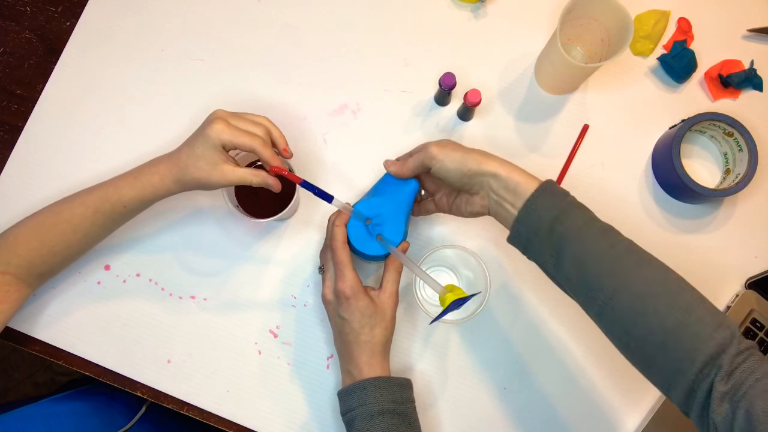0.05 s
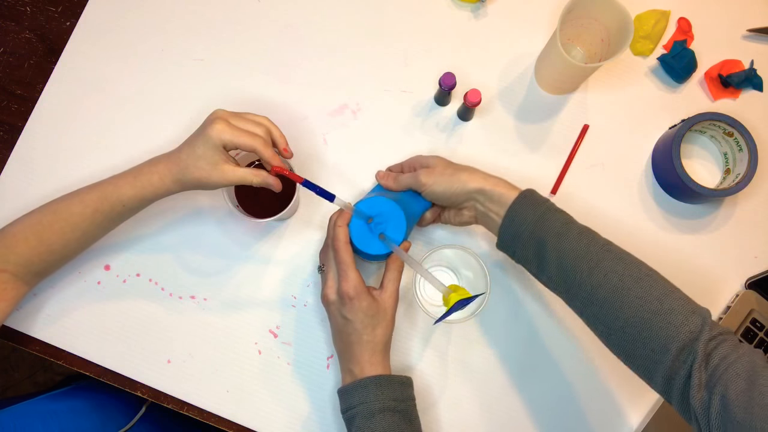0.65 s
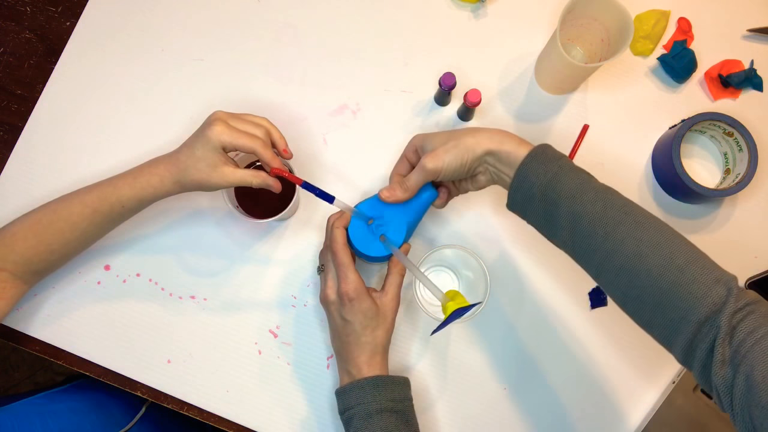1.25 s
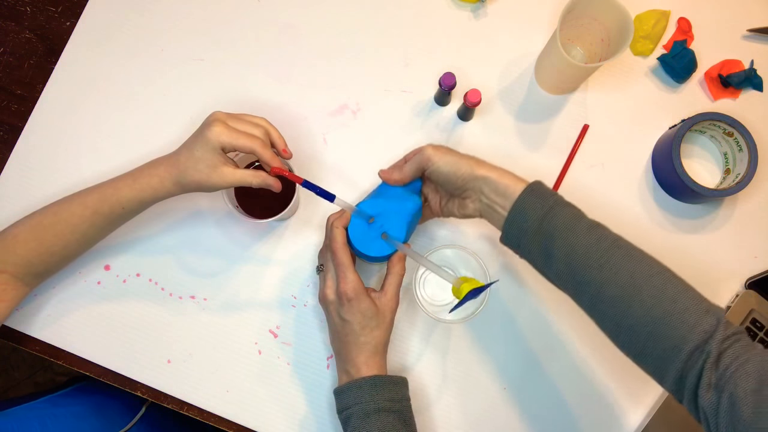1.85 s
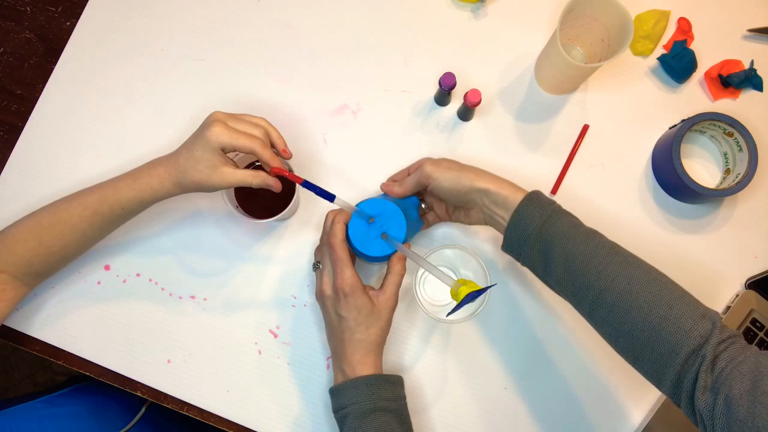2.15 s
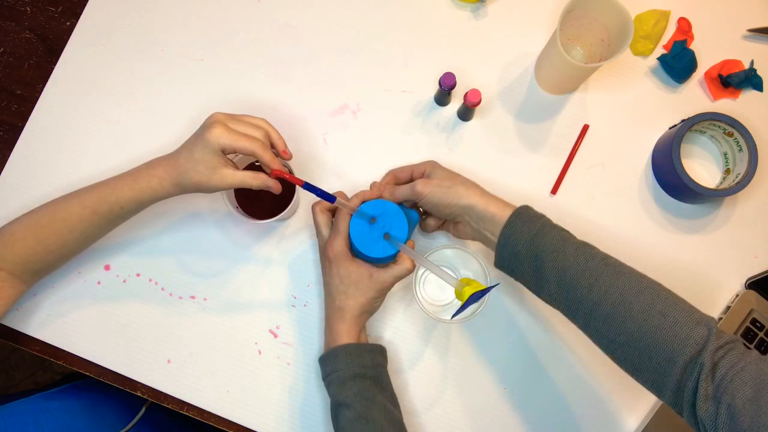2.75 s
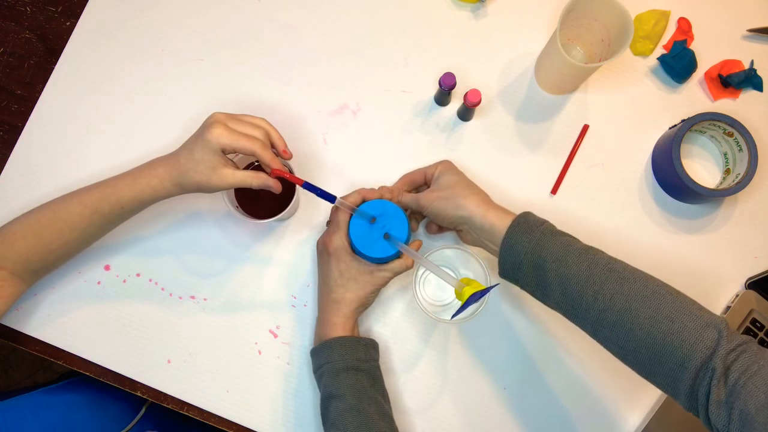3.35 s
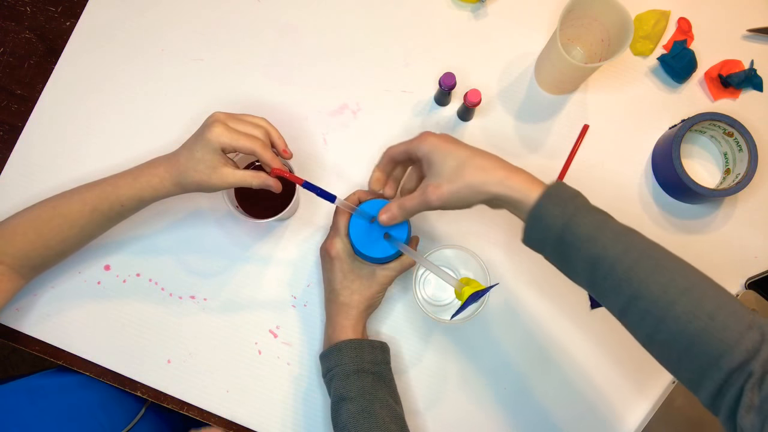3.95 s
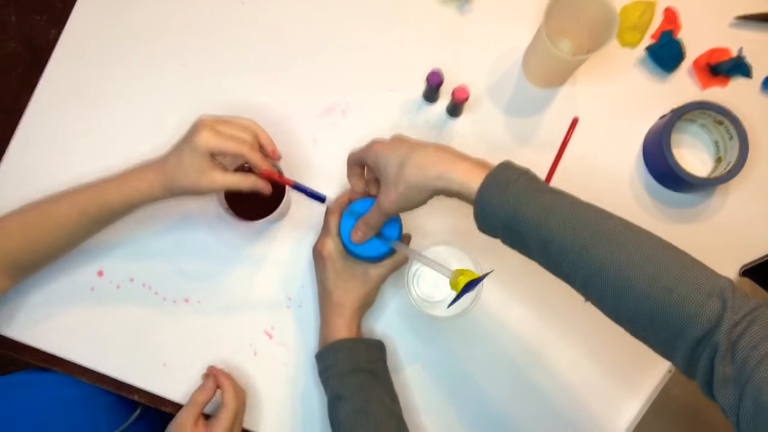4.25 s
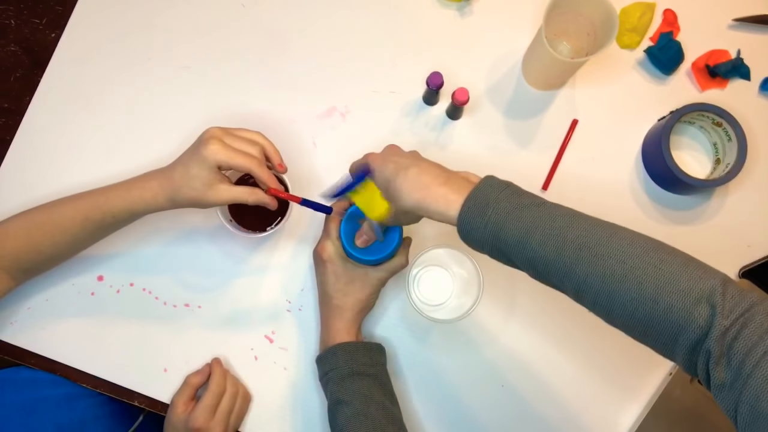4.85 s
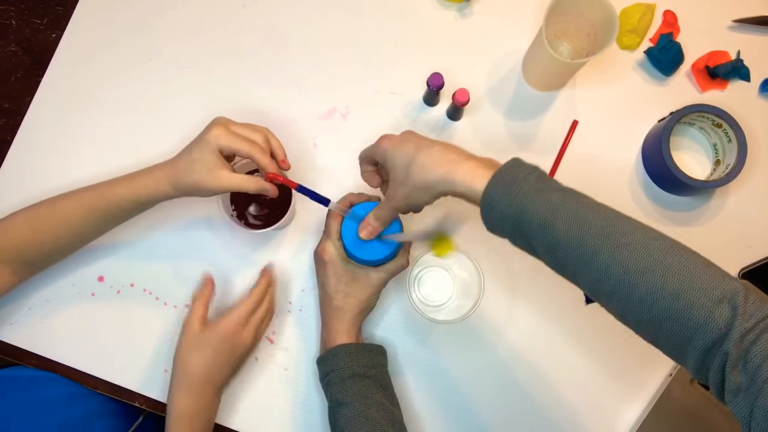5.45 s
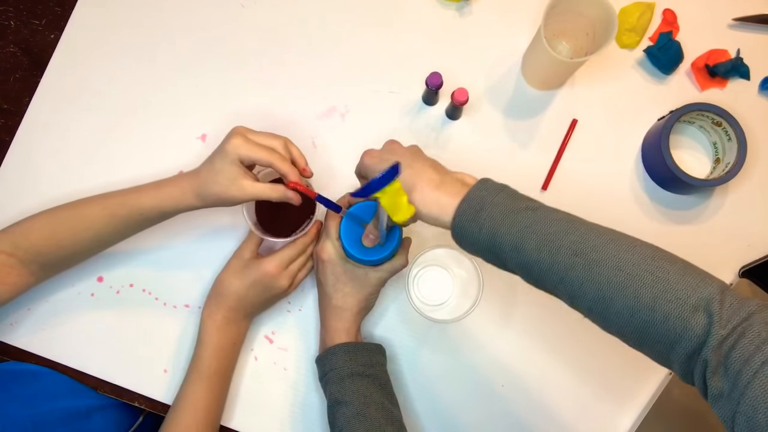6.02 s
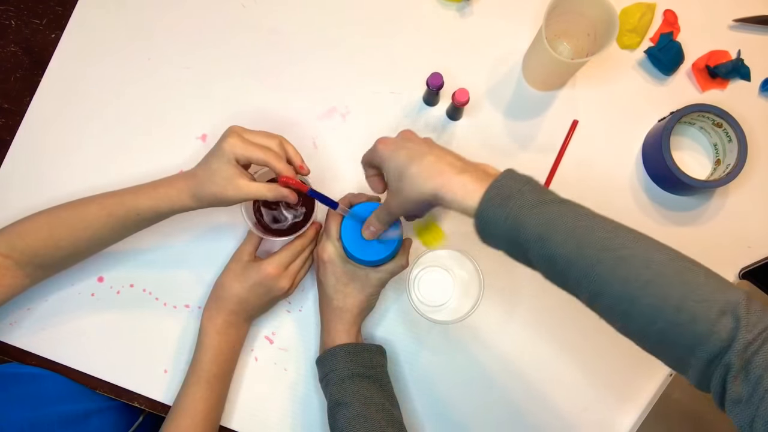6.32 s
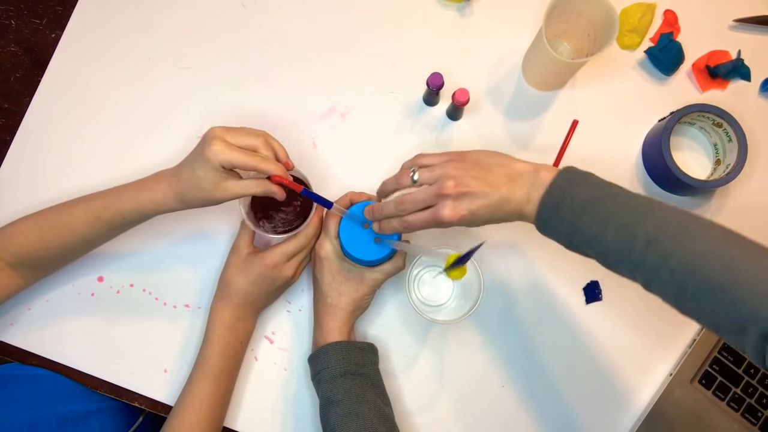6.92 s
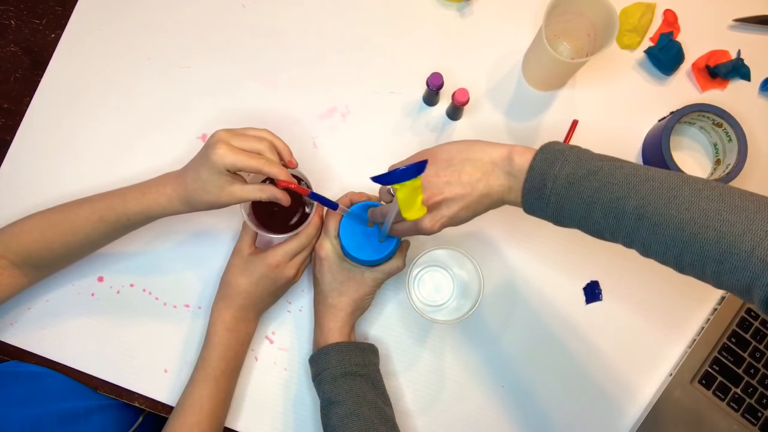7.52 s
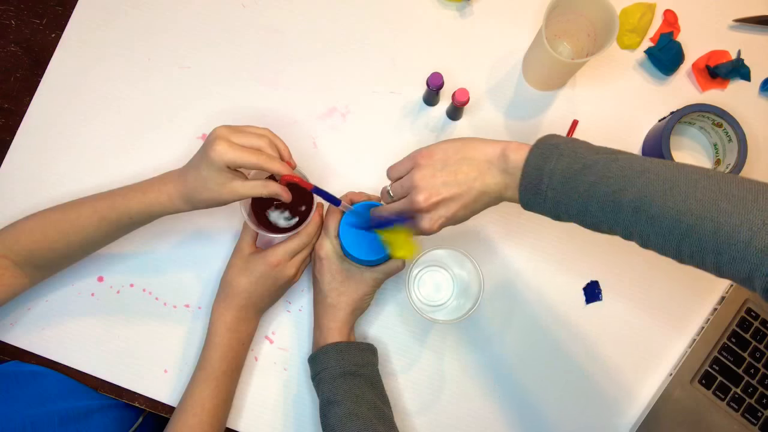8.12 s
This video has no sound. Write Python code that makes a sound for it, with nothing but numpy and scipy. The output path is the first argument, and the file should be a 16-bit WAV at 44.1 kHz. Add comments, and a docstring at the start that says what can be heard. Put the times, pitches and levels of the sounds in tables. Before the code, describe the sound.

Close above a table in a small, faintly humming room, a balloon is stretched over a plastic cup with quiet scuffs and light knocks. A small rubber snap comes first, then two sharp, loud ones half a second apart. Hands go on tapping and rubbing the cup, straws click on the rims, and pressing the balloon pushes faint gurgles and bubble plops through the straws.

```python
"""A low room hum, then fingers rubbing and knocking on a toy pump: a balloon stretched over a plastic cup,
with straws into two more cups. The rubber slips and snaps onto the cup three times, ringing skin and wall.
Then the skin is pressed and let go: straws tick against the cups, and a little water gurgles, plops and
hoots through them. One microphone, close above a table in a small room."""
import sys
import numpy as np
from scipy import signal
from scipy.fft import rfft, irfft
from scipy.io import wavfile

SR = 44100
rng = np.random.default_rng(int(sys.argv[2]) if len(sys.argv) > 2 else 0)


def waveform_to_disk(signal):
    """Save audio, clipped to [-1, 1], as 16-bit WAV at the path in sys.argv[1]."""
    frames = np.transpose(np.atleast_2d(signal))
    scaled = np.clip(frames, -1, 1) * 32767
    samples = np.round(scaled).astype(np.int16)
    wavfile.write(sys.argv[1], SR, samples)


N = 360738
TIME = np.arange(N) / SR
AGE = TIME[:SR // 3]  # seconds into one short event
SWELL_LEAD_S = AGE.mean()  # a swell starts this long before its peak


def undb(db):
    """Decibels to gain."""
    return 10 ** (np.asarray(db) / 20)


def unit(x):
    """Scale to unit energy."""
    return x / np.sqrt(np.sum(x ** 2) + 1e-18)


def unit_peak(x):
    """Scale to a peak of 1."""
    return x / np.abs(x).max()


def add(track, s, x):
    """Mix x into the track from time s."""
    i = int(s * SR)
    track[i:i + len(x)] += x[:N - i]


def play(rows, voice, lead_s=0):
    """Sound the voice once a row, lead_s before the time in the row's first column."""
    out = np.zeros(N)
    for s, *settings in rows:
        add(out, s - lead_s, voice(*settings))
    return out


def band(x, hz, q):
    """One resonance."""
    w = 2 * np.pi * min(hz, .45 * SR) / SR
    a = np.sin(w) / (2 * q)
    return signal.lfilter([a, 0, -a], [1 + a, -2 * np.cos(w), 1 - a], x)


def low_cut(x, hz):
    """Take off the bass."""
    return signal.sosfilt(signal.butter(2, hz, "highpass", fs=SR, output="sos"), x)


def high_cut(x, hz, order=2):
    """Take off the treble."""
    return signal.sosfilt(signal.butter(order, min(hz, .45 * SR), fs=SR, output="sos"), x)


def colour(x, points, size=2048):
    """Causal filter through (Hz, dB) points."""
    hz, db = np.transpose(points)
    grid = np.maximum(np.fft.rfftfreq(size, 1 / SR), 1)
    gain = undb(np.interp(np.log(grid), np.log(hz), db))
    cepstrum = irfft(np.log(gain))
    cepstrum[1:size // 2] *= 2  # fold to minimum phase
    cepstrum[size // 2 + 1:] = 0
    return signal.fftconvolve(x, irfft(np.exp(rfft(cepstrum))))[:len(x)]


def fade(t60):
    """Free decay after a blow, 60 dB down in t60 seconds."""
    return np.exp(-np.log(1000) * AGE / t60)


def ring(modes):
    """Damped modes struck together."""
    return unit(sum(undb(db) * fade(t60) * np.sin(2 * np.pi * hz * AGE) for hz, db, t60 in modes))


def burst(t60):
    """A dying rattle of tiny contacts."""
    return unit(rng.standard_normal(len(AGE)) * fade(t60))


def crack(rattle_db, t60):
    """One clean impact and the rattle behind it."""
    return signal.unit_impulse(len(AGE)) + undb(rattle_db) * burst(t60)


def swell(x, half_s):
    """A bell-shaped swell of the given half length, centred in x, of rms 1 at its top."""
    bell = np.exp(-((AGE - SWELL_LEAD_S) / half_s) ** 2 / 2)
    return x / np.std(x) * bell * signal.windows.tukey(len(AGE), .5)


def grains(per_s, spread_db):
    """Random tiny impulses of uneven size."""
    chance, size = rng.random(len(AGE)), rng.standard_normal(len(AGE))
    return (chance < per_s / SR) * np.sign(size) * undb(spread_db * np.abs(size))


def waver(hz):
    """A slow random wobble of spread 1."""
    wobble = high_cut(rng.standard_normal(len(AGE)), hz)
    return wobble / np.std(wobble)


# The room's air, all round the microphone. Each row: frequency in Hz, relative level in dB.
AIR_COLOUR = [(15, -51), (25, -15), (70, -1), (127, -2), (161, -8), (185, -9.5), (263, -10), (301, -15),
              (373, -16.5), (624, -23), (677, -24.5), (1370, -28.5), (1890, -33), (3520, -35.5),
              (7000, -39.5), (9400, -43), (10400, -48.5), (11500, -42), (16000, -46.5)]
# The hum in the room. Each row: pitch in Hz, rms level in dB.
HUM_TONES = [(97, -67), (190, -67.5), (261, -76.5)]


def room_tone(air_db=-56.5):
    """Low room rumble, smooth hiss and a wavering hum."""
    air = colour(rng.standard_normal(N), AIR_COLOUR, size=8192)
    hum = sum(undb(db) * unit(band(band(rng.standard_normal(N), hz, 16), hz, 16)) for hz, db in HUM_TONES)
    return np.sqrt(N) * (undb(air_db) * unit(air) + hum)


# Fingers on the balloon, just below the microphone; quick scuffs are broad, slow drags sing.
# Each row: peak time in seconds, half length in seconds, level in dB before gain_db, centre in Hz, Q.
FINGER_RUBS = [(0.281, 0.0086, -56.5, 5760, 0.75), (0.32, 0.0098, -56, 3470, 0.3),
               (0.795, .022, -60, 2870, 0.61), (1.019, 0.076, -70.5, 3500, .6),
               (1.072, 0.013, -56.5, 2880, 0.93), (1.213, 0.046, -67, 2700, 0.73),
               (1.452, 0.022, -59, 3880, 0.78), (1.982, .022, -64.5, 3200, .74),
               (2.131, 0.032, -62, 3800, 0.86), (2.244, 0.033, -58, 3500, 0.57),
               (2.63, 0.024, -60, 3800, 1.04), (2.81, 0.12, -70.5, 3800, 4.7),
               (3.069, 0.17, -71, 5500, 0.6), (4.173, 0.013, -51, 2880, 0.71),
               (4.241, 0.059, -63.5, 2470, 3.5), (5.052, 0.0085, -57.5, 6400, 2.7),
               (5.47, 0.067, -73, 4500, 0.57), (5.719, 0.096, -71, 4100, 5), (5.97, 0.1, -70.5, 4170, 3.8),
               (5.959, 0.11, -71, 6650, 2.5), (6.662, 0.026, -69, 4000, .7),
               (7.371, 0.14, -74.5, 4095, 6.2), (7.738, 0.045, -74, 4090, 1.7),
               (8.063, 0.01, -62, 5200, 1.8), (8.143, .051, -67.5, 4200, 7.1)]


def rub(half_s, db, hz, q, gain_db=-3, hiss_db=-14, grip_db=2):
    """Skin slides on the rubber in dense, tiny slips under an uneven grip: a resonance over a soft hiss."""
    slips = grains(per_s=6000, spread_db=3) * undb(grip_db * waver(35))
    sing = unit(band(band(slips, hz, q), hz, q))
    hiss = unit(high_cut(band(slips, 3000, 0.77), 11000)) / np.sqrt(q)
    return undb(db + gain_db) * swell(sing + undb(hiss_db) * hiss, half_s)


# Fingers, cups and straws knocking together on the table.
# Each row: start in seconds, peak level of the ring in dB, pitch in Hz.
CUP_KNOCKS = [(.799, -38.5, 292), (0.825, -42.5, 329), (.902, -42.5, 448), (.974, -38, 388),
              (1.467, -44, 493), (1.663, -52, 490), (1.714, -49, 482), (1.716, -56, 944),
              (1.851, -62, 1380), (2.628, -58, 1000), (3.322, -44, 348), (3.52, -52.5, 525),
              (3.634, -42, 333), (3.662, -39.5, 440), (4.151, -43, 227.5), (4.154, -40.5, 759),
              (4.159, -27.5, 365), (4.161, -36.5, 608), (4.167, -41, 336), (4.18, -38.5, 610),
              (4.262, -53, 1350), (4.358, -44, 416), (4.401, -57, 770), (4.399, -54, 1720),
              (4.486, -37, 383), (4.484, -45.5, 825), (4.779, -48, 854), (4.935, -45.5, 797),
              (5.005, -55, 846), (5.375, -41, 435), (5.614, -48, 475), (5.615, -52.5, 1090),
              (6.3135, -42.5, 900), (6.364, -48.5, 1315), (6.511, -52.5, 1114), (6.802, -33, 392),
              (6.801, -50, 1020), (6.853, -49, 553), (6.8535, -54, 1110), (7.087, -62, 913),
              (7.385, -59, 1000), (7.694, -50, 431), (7.936, -46, 572), (7.9365, -44.5, 850),
              (7.94, -41.5, 1120), (8.143, -56.5, 1040)]


def knock(db, hz, middling_db=-45, middling_hz=600, push_cycles=0.84):
    """A soft blow: a hand-damped cup mode, a weaker one above, and a scuff of contact."""
    t60 = 0.042 * 2 ** ((middling_db - db) / 59)  # a firmer finger damps the cup
    push = 1 - np.exp(-AGE * hz / push_cycles)  # low knocks swell, high ones start at once
    body = ring([(hz, 0, t60), (1.3 * hz, -5, 0.71 * t60)]) * push
    scuff_db = -9.5 + 9.5 * np.log2(hz / middling_hz)  # small, stiff parts scuff more
    scuff_hz = 970 * (hz / middling_hz) ** 0.043
    scuff = high_cut(band(band(burst(0.069), scuff_hz, 0.92), scuff_hz, 0.62), 2900)
    return undb(db) * (unit_peak(body) + undb(scuff_db) * unit_peak(scuff))


# Straws against the cup rims, close up.
# Each row: start in seconds, peak level in dB before gain_db, straw resonance in Hz.
STRAW_TICKS = [(0.902, -50.5, 3680), (0.974, -48, 3400), (1.7143, -52, 2110), (3.118, -45, 1300),
               (3.6628, -30, 9200), (4.026, -44.5, 1800), (4.409, -47.5, 5580), (4.614, -49, 1600),
               (4.735, -54.5, 2320), (4.779, -47, 2200), (4.9344, -46.5, 4440), (4.959, -53.5, 3320),
               (5.0035, -51.5, 4570), (5.6133, -43.5, 5460), (5.793, -51.5, 1300), (5.835, -53, 1450),
               (6.3154, -46, 1390), (6.3627, -35, 12200), (6.51, -42, 5650), (6.6461, -40, 2400),
               (6.647, -45, 3860), (6.694, -44, 3650), (6.7995, -48.5, 2270), (6.8523, -45, 5400),
               (7.086, -55, 3950), (7.381, -52, 4540), (7.669, -47.5, 3870), (7.7934, -46, 2200),
               (8.0405, -51, 4250)]


def tick(db, hz, gain_db=3, rim_db=-7, broad_db=-15):
    """Hard plastic touches plastic: a click briefly rings the straw and, never quite alike, the rim."""
    hit = crack(0, t60=.026 / np.hypot(1, hz / 5000))  # high ticks die sooner
    rim_hz = 4300 * np.exp(.15 * rng.standard_normal())
    straw = band(hit, hz, 3.5)
    rim = undb(rim_db) * band(hit, rim_hz, 4)
    broad = undb(broad_db) * band(hit, 2200, .74)
    return undb(db + gain_db) * unit_peak(straw + rim + broad)


# Hands passing lightly over the balloon, faint even this close.
# Each row: peak time in seconds, half length in seconds, level in dB.
HAND_RUSTLES = [(1.048, 0.034, -72.5), (1.604, .03, -77.5), (2.165, .06, -81), (3.036, 0.038, -79),
                (4.204, 0.088, -72.5), (4.58, 0.053, -89), (5.04, 0.031, -74), (5.45, 0.08, -70.5),
                (5.75, .09, -73), (5.98, 0.11, -76), (6.68, 0.033, -68), (7.285, 0.021, -74),
                (7.73, .04, -73), (8.083, .04, -73.5)]
# Their tone at the microphone. Each row: frequency in Hz, relative level in dB.
BRUSH_COLOUR = [(1000, -20.5), (4000, -4.5), (7000, -0.5), (10300, -8.5), (13500, -1.5), (16000, -2)]


def rustle(half_s, db):
    """Dry skin and sleeve brush the balloon in very fine grains."""
    return undb(db) * swell(colour(grains(per_s=2500, spread_db=5), BRUSH_COLOUR), half_s)


def gurgle(half_s, db, hz, gain_db=-1):
    """Small bubbles of several sizes, each ringing for a few cycles, muffled by the cup."""
    ratios = np.geomspace(.58, 1.6, 7)
    bubbles = sum(band(grains(per_s=60, spread_db=4), hz * ratio, 9) / ratio for ratio in ratios)
    muffled = high_cut(band(bubbles, hz, 0.23), 1650, order=4)
    return undb(db + gain_db) * swell(muffled, half_s)


def creak(half_s, db, hz=2210, q=0.37):
    """Sparse, crisp slips of the stretched rubber under a finger."""
    slips = signal.fftconvolve(grains(per_s=46, spread_db=4), crack(0, t60=0.026))[:len(AGE)]
    return undb(db) * swell(band(band(slips, hz, q), hz, q / 2), half_s)


# A finger bearing down on the pump cup.
# Each row: peak time in seconds, half length in seconds, level in dB before the gurgle's gain_db.
SKIN_PRESSES = [(1.462, 0.011, -55.5), (4.236, 0.039, -62), (4.588, 0.12, -64.5), (5.861, 0.047, -60),
                (6.877, 0.014, -64), (7.751, 0.041, -64)]


def press(half_s, db):
    """Pressing drives water through the straws while the skin creaks, longer and quieter."""
    return gurgle(half_s, db, hz=1022) + creak(1.9 * half_s, db - 13)


# The thin wall of the pump cup. Each row: mode in Hz, relative level in dB, t60 in seconds.
CUP_WALL_MODES = [(1236, -10.5, 0.16), (1365, -13.5, .23), (2530, -10, .12), (3110, -15.5, .22),
                  (3844, -13.5, .22), (4030, -14, 0.32), (6370, -5, .15), (6270, -5.5, .16),
                  (6430, -3.5, .11), (6544, -6.5, .12), (6770, -6, .14), (6960, -6.5, .12),
                  (7600, -9.5, .18), (7750, -10, .12)]


def cup_wall(hardness_hz):
    """The thin cup wall rings; a soft contact leaves its high modes quiet."""
    return unit(high_cut(ring(CUP_WALL_MODES), hardness_hz, order=4))


# The balloon over the cup's air. Each row: mode in Hz, relative level in dB, t60 in seconds.
BALLOON_MODES = [(186.5, -1.5, 0.043), (258, -6, 0.19), (317.2, -9.5, 0.2), (345, -8, 0.18),
                 (393, -11.5, 0.071), (489, -5, 0.15)]


def balloon_skin(rise_s=0.0018):
    """The heavy, slack skin takes a moment to get going, then rings."""
    return ring(BALLOON_MODES) * (1 - np.exp(-AGE / rise_s))


def rattle(t60, treble_t60, split_hz=7800):
    """Rubber chatters against the rim; the treble has its own decay, mostly quicker."""
    contacts = rng.standard_normal(len(AGE))
    below_split = np.fft.rfftfreq(len(AGE), 1 / SR) < split_hz
    low = irfft(rfft(contacts) * below_split, len(AGE))
    return unit(low * fade(t60) + (contacts - low) * fade(treble_t60))


# Rubber snapping onto the cup, the loudest thing at the microphone; the last two rows make one snap.
# Each row: start in seconds, slap level in dB, rattle in dB relative to the slap, rattle t60 and its
# treble t60 in seconds, skin ring in dB, wall ring in dB, hardness in Hz, send to the room in dB.
RUBBER_SNAPS = [(2.2566, -13, 5.5, 0.032, .012, -26, -34, 6400, -12),
                (3.1507, 5, 2, 0.024, .011, -3, -4, 14000, -8),
                (3.6044, -21.5, -2, .012, .012, -40, -38, 14000, -14),
                (3.6087, 6.5, -4, .008, .005, -11, -15, 13920, -14)]
# The tone of a slip, a slap on the rim and a slap on the wall, from above the cup.
# Each row: frequency in Hz, relative level in dB.
SLIP_TONE = [(120, -57), (200, 0), (500, -2), (780, -1), (1000, -16), (1600, -6.5), (1850, -14),
             (2150, -11), (2510, -8.5), (3600, -8.5), (4150, -0.5), (4700, -12), (5840, -8.5), (7900, -18),
             (9000, -9.5), (11500, -17), (15500, -8.5)]
RIM_TONE = [(120, -31.5), (200, -4.5), (353, 0.5), (620, -12.5), (860, -10.5), (1050, -14), (1300, -3),
            (2000, -13.5), (2560, -6), (2860, -15.5), (3310, -7.5), (5200, -6.5), (6640, 0.5), (9580, -10),
            (14600, -5.5), (16000, -15)]
WALL_TONE = [(120, -47.5), (200, -13.5), (482, -5.5), (735, -29), (1060, -19), (1480, -25), (2420, -7.5),
             (3310, -14.5), (4120, -5), (5400, -5), (6880, 0), (8420, -9.5), (11100, -8), (16000, -19.5)]


def snaps(room_colour_share=.5):
    """The rubber slaps the cup; skin and wall ring on. Gives the direct sound and the room's share."""
    direct, sent = np.zeros(N), np.zeros(N)
    click = signal.unit_impulse(len(AGE))
    for row, tone in zip(RUBBER_SNAPS, (SLIP_TONE, RIM_TONE, WALL_TONE, WALL_TONE)):
        s, db, rattle_db, t60, treble_t60, skin_db, wall_db, hardness_hz, room_db = row
        slap = undb(db) * unit(low_cut(colour(click, tone), 420))  # a small source radiates little bass
        contacts = click + undb(rattle_db) * rattle(t60, treble_t60)
        rings = undb(skin_db) * balloon_skin() + undb(wall_db) * cup_wall(hardness_hz)
        add(direct, s, signal.fftconvolve(slap, contacts)[:len(AGE)] + rings)
        # the room collects all directions, which evens out peaks and notches
        even_tone = [(hz, room_colour_share * level) for hz, level in tone]
        spread = unit(high_cut(low_cut(colour(click, even_tone), 300), hardness_hz))
        strength = undb(db) * np.hypot(1, undb(rattle_db))  # slap and rattle together
        add(sent, s, undb(room_db) * (strength * spread + undb(-3) * rings))
    return direct, sent


# A faint hiss after each of the two loud snaps. Each row: start in seconds, rms level in dB.
SNAP_HISSES = [(3.151, -61), (3.609, -64)]
# Its tone. Each row: frequency in Hz, relative level in dB.
HISS_TONE = [(200, -10), (800, 0), (2000, -4), (4000, -7), (7000, -9), (11000, -15.5), (16000, -17.5)]


def after_hiss(db, length_s=.43, release_s=.05):
    """A faint, even hiss lingers about 0.4 s and stops short."""
    hiss = colour(rng.standard_normal(N), HISS_TONE)
    return undb(db) * hiss / np.std(hiss) * np.clip((length_s - TIME) / release_s, 0, 1)


# The table under a hand, below the microphone.
# Each row: start in seconds, starting level in dB, pitch in Hz, t60 in seconds before the taper.
TABLE_THUMPS = [(3.158, -41.5, 67.3, 0.56), (4.19, -48, 38.2, 0.65), (4.361, -49.5, 32.8, 1)]


def thump(db, hz, t60):
    """A slow, deep swing of the table top."""
    taper = np.linspace(1, 0, len(AGE))
    return undb(db) * fade(t60) * np.sin(2 * np.pi * hz * AGE) * taper


# A hand against the side of the pump cup. Each row: start in seconds, level in dB.
HAND_BUMPS = [(4.156, -31.5), (4.178, -28)]


def bump(db):
    """A hand bumps the cup hard enough to ring its wall."""
    return undb(db) * cup_wall(hardness_hz=3740)


# Wet crackle inside the straws. Each row: peak time in seconds, half length in seconds, level in dB.
STRAW_CRACKLES = [(4.384, 0.047, -69.5), (4.602, 0.06, -74.5), (5.377, .02, -59), (5.483, 0.028, -66.5),
                  (5.868, 0.029, -72), (6.373, 0.02, -60), (6.879, .02, -73.5), (8.155, 0.013, -74)]


def crackle(half_s, db, hz=1650, q=0.99):
    """Small films of water burst in the straws, each a short wet pop."""
    pops = signal.fftconvolve(grains(per_s=80, spread_db=4), crack(-3, t60=0.012))[:len(AGE)]
    return undb(db) * swell(band(band(pops, hz, q), hz, q), half_s)


# Single bubbles at a straw's end, down in a cup.
# Each row: start in seconds, peak level of the tone in dB, starting pitch in Hz.
BUBBLE_PLOPS = [(4.534, -52, 840), (4.542, -53, 954), (4.613, -47, 870), (4.685, -56, 902),
                (4.733, -55, 755), (5.345, -49, 793), (5.507, -56.5, 980), (5.764, -55, 782),
                (5.792, -49, 1130), (5.833, -53, 1350), (5.838, -53.5, 816), (5.876, -53, 790),
                (5.893, -52, 744), (5.998, -60.5, 730), (6.072, -61, 800), (7.76, -57, 1316)]


def plop(db, hz, ring_cycles=59, rise_per_s=0.7, splash_db=-3, splash_hz=1400):
    """One bubble rings and rises a little in pitch, with a small splash of droplets."""
    onset = 1 - np.exp(-AGE / 0.00095)
    phase = 2 * np.pi * hz * AGE * (1 + rise_per_s * AGE / 2)
    tone = np.sin(phase) * fade(ring_cycles / hz) * onset
    droplets = grains(per_s=1500, spread_db=3) * fade(.11) * onset
    splash = high_cut(band(band(droplets, splash_hz, 1.2), splash_hz, 1.0), 2900, order=4)
    return undb(db) * (unit_peak(tone) + undb(splash_db) * unit_peak(splash))


# The finger lifting off the pump cup. Each row: time in seconds, reference level of the water in dB.
SKIN_RELEASES = [(5.335, -50), (6.305, -55.5)]
# Water running back after each release. Each row: delay to the peak in seconds, half length in seconds,
# level in dB relative to the water, bubble pitch in Hz.
RETURN_GULPS = [(0.036, 0.032, -2.5, 1105), (0.068, 0.029, 1, 783)]


def releases(slide_half_s=0.028, slide_db=-7.5):
    """The finger slides off the skin and water gulps back twice, the second gulp lower in pitch."""
    out = np.zeros(N)
    for s, water_db in SKIN_RELEASES:
        start = s - SWELL_LEAD_S
        add(out, start + slide_half_s / 2, rub(slide_half_s, water_db + slide_db, hz=2758, q=0.77))
        for delay, half_s, db, hz in RETURN_GULPS:
            add(out, start + delay, gurgle(half_s, water_db + db, hz))
    return out


# A straw hooting between the cups.
# Each row: peak time in seconds, half length in seconds, level in dB, pitch in Hz.
STRAW_HOOTS = [(5.445, .012, -49.5, 478), (5.481, .005, -52.5, 520), (5.517, .007, -50.5, 480),
               (5.557, 0.0073, -59, 530), (5.597, .007, -68, 455), (6.398, 0.013, -44, 480),
               (6.445, 0.0061, -56, 505), (6.567, .012, -59, 470), (7.305, 0.021, -59.5, 470),
               (7.398, .014, -59.5, 480)]
# The air inside that straw. Each row: multiple of the pitch, relative level in dB.
PIPE_MODES = [(1, 4.5), (1.902, -14), (2.83, -12.5)]


def hoot(half_s, db, pitch_hz):
    """A gulp of water briefly sounds the pipe modes of a straw, unsteady in pitch and strength."""
    pipe = 0
    for ratio, mode_db in PIPE_MODES:
        hz = ratio * pitch_hz * (1 + .03 * waver(60))
        pipe = pipe + undb(mode_db) * np.sin(2 * np.pi * np.cumsum(hz) / SR)
    flutter = undb(2.5 * waver(50))
    return undb(db) * swell(pipe * flutter, half_s)


# The small room, heard from the table. Each row: band centre in Hz, level in dB, t60 in seconds.
ROOM_BANDS = [(125, 5, .59), (230, -1.5, 1), (487, 4, 0.59), (895, 2, 0.35), (1998, 0.5, .41),
              (3942, -4, 0.54), (6950, 1.5, .45), (9600, -3.5, 0.21), (15170, -10.5, .37)]
# Table and ceiling reflecting into the microphone. Each row: delay in seconds, level in dB.
NEAR_ECHOES = [(.0036, -11), (.013, -8)]


def room(x, build_s=0.0073, scatter_s=.0012):
    """Two near reflections and a diffuse tail."""
    t = TIME[:SR]
    noise = rfft(rng.standard_normal(len(t)))
    log_hz = np.log(np.maximum(np.fft.rfftfreq(len(t), 1 / SR), 1))
    centres = np.log([row[0] for row in ROOM_BANDS])
    response = np.zeros(len(t))
    for this_band, (_, db, t60) in zip(np.eye(len(ROOM_BANDS)), ROOM_BANDS):
        decay = np.exp(-np.log(1000) * t / t60) * (1 - np.exp(-t / build_s))
        band_noise = irfft(noise * np.interp(log_hz, centres, this_band), len(t))
        response += band_noise * undb(db) * unit(decay)
    # the reflections scatter a little and lose their top and bottom on the way
    bounce = unit(band(rng.standard_normal(len(t)) * np.exp(-t / scatter_s), 7300, 1.0))
    for delay, db in NEAR_ECHOES:
        response += undb(db) * np.roll(bounce, int(delay * SR))
    return signal.fftconvolve(x, response)[:N]


def scene():
    """Everything on the table, heard in mono from above."""
    snap, snap_sent = snaps()
    background = room_tone()
    hands = play(CUP_KNOCKS, knock) + play(HAND_BUMPS, bump) + play(STRAW_TICKS, tick)
    hands += play(FINGER_RUBS, rub, SWELL_LEAD_S) + play(HAND_RUSTLES, rustle, SWELL_LEAD_S)
    pumping = play(SKIN_PRESSES, press, SWELL_LEAD_S) + releases()
    pumping += play(STRAW_CRACKLES, crackle, SWELL_LEAD_S) + play(STRAW_HOOTS, hoot, SWELL_LEAD_S)
    pumping += play(BUBBLE_PLOPS, plop)
    direct = snap + hands + pumping + play(TABLE_THUMPS, thump) + play(SNAP_HISSES, after_hiss)
    reverb = room(snap_sent + undb(-10) * (hands + pumping))  # the hands shield the small sounds
    return (direct + reverb + background)[None]


def record(dry, ceiling=.74, top_hz=16300):
    """The recorder clips the very tip of a snap and cuts the top."""
    clipped = np.clip(dry, -ceiling, ceiling)
    return signal.sosfilt(signal.ellip(8, .2, 70, top_hz, fs=SR, output="sos"), clipped)


dry = scene()
out = record(dry)
waveform_to_disk(out)
```